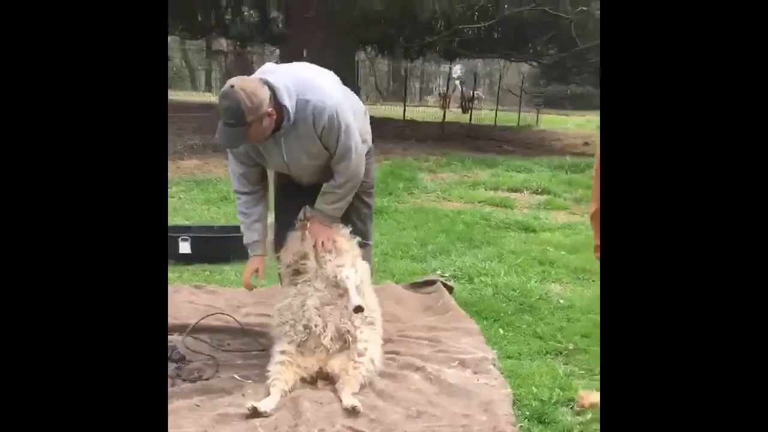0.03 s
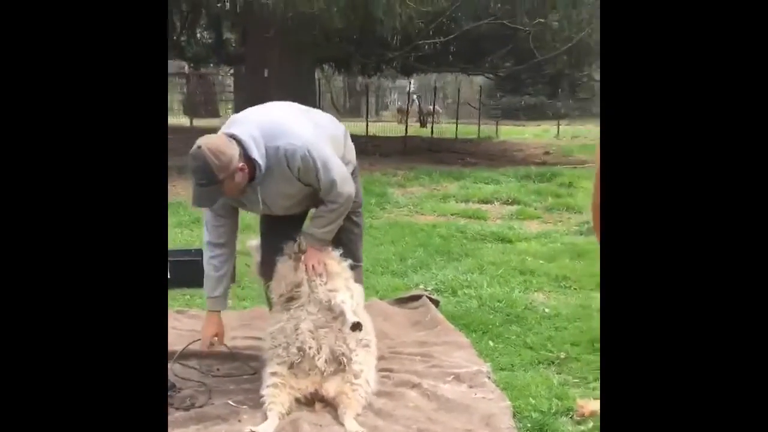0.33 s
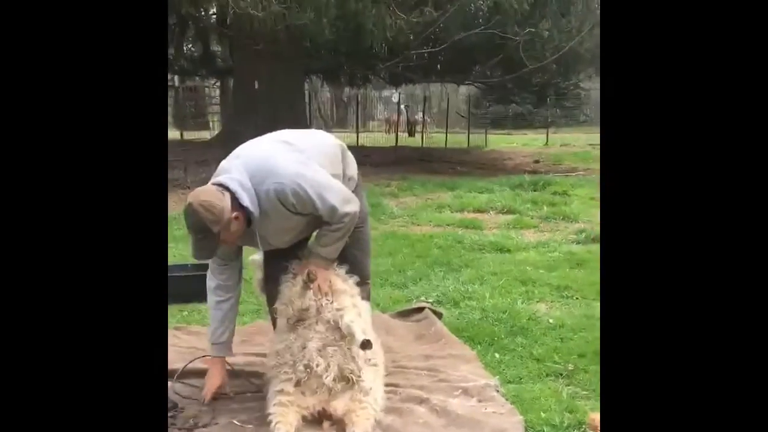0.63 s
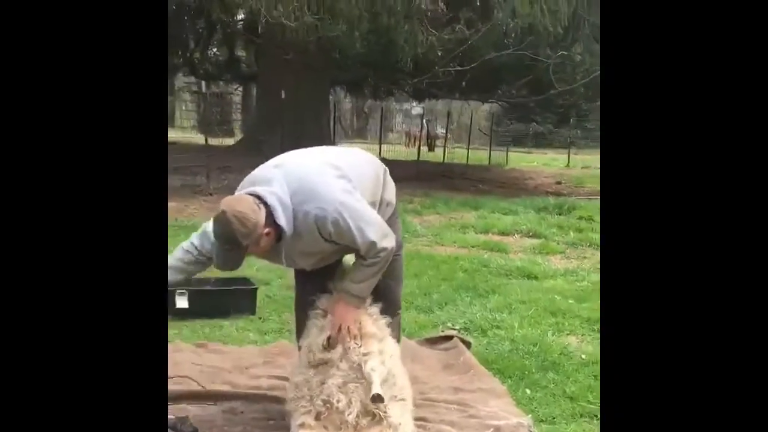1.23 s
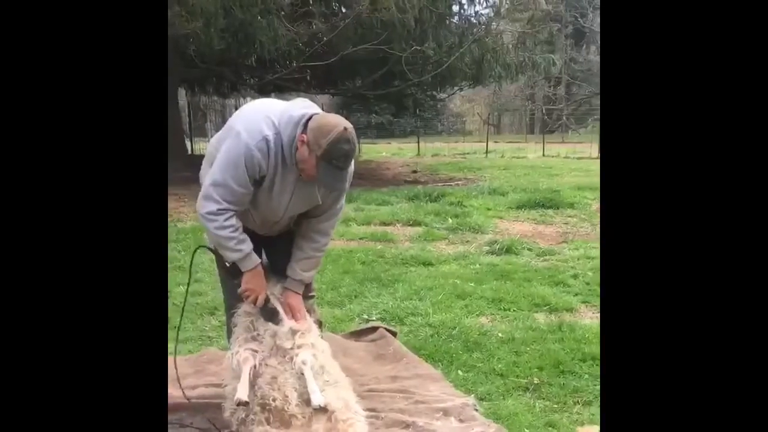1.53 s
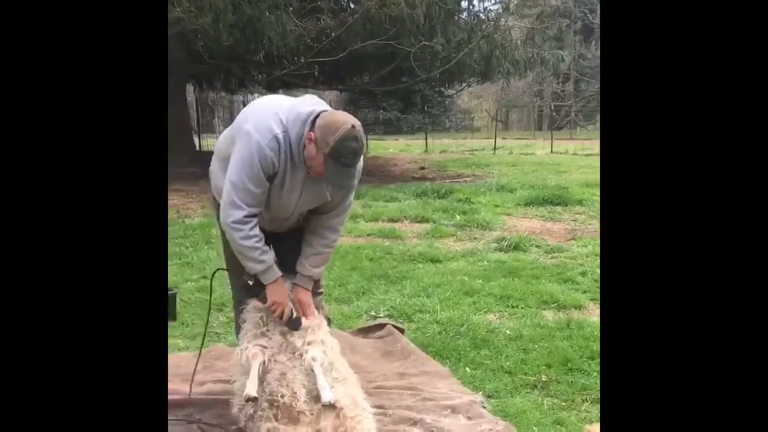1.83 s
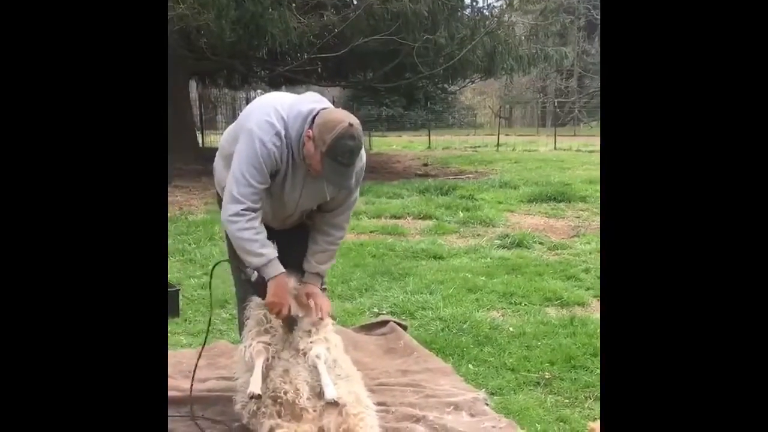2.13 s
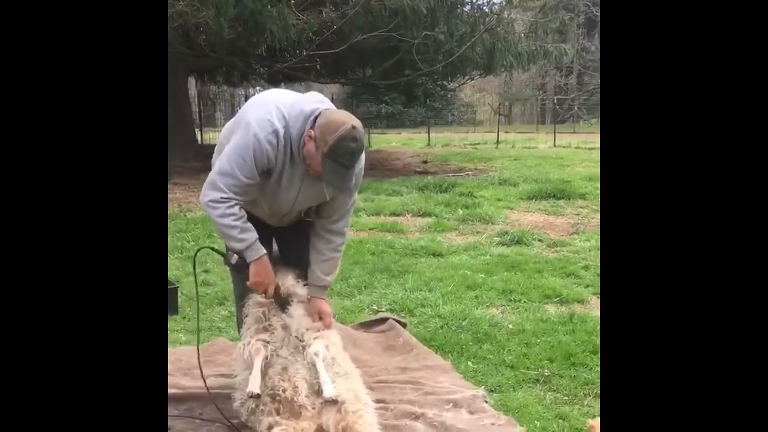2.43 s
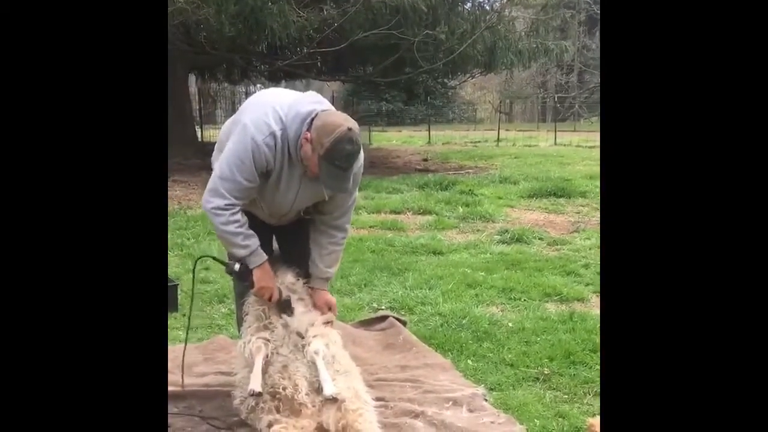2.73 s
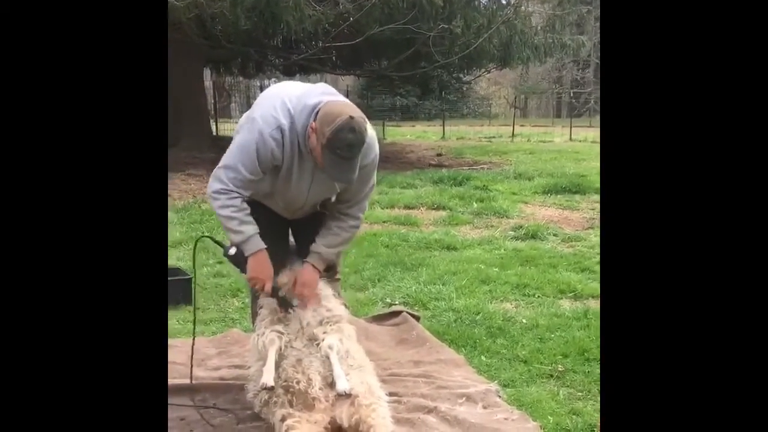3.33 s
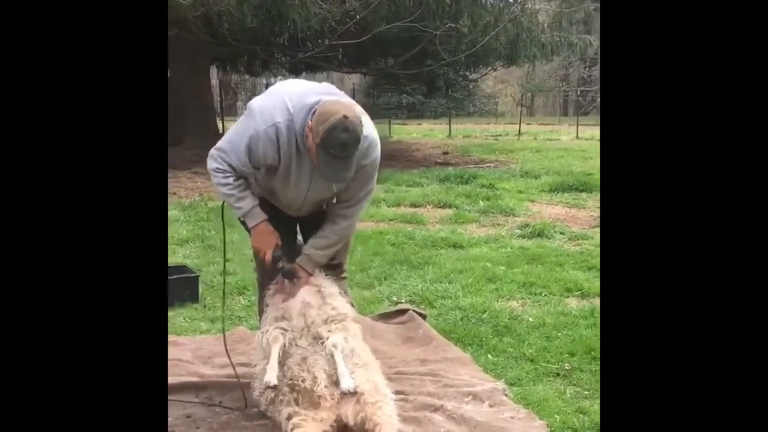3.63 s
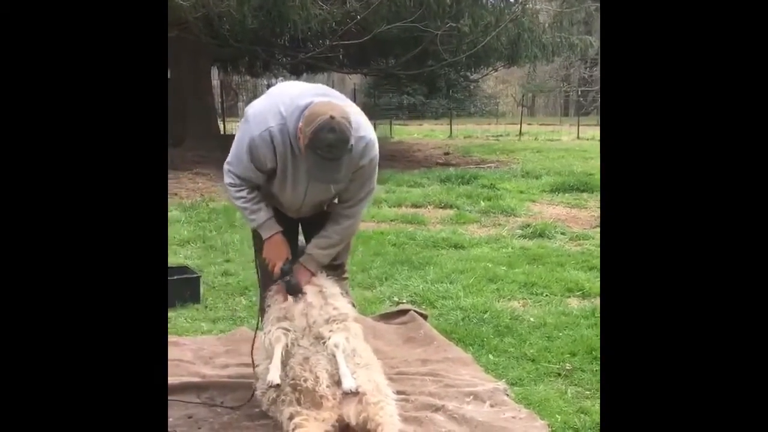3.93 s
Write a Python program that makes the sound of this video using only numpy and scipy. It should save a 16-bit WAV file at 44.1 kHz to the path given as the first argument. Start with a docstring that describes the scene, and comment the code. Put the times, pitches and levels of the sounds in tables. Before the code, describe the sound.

Electric shears start after some handling clicks and rustles, then buzz steadily through fleece.

```python
"""Outdoors, a shearer drags his handpiece and its cable off a cloth tarp, with rustles, ticks and a few
bumps on the microphone. From 1.27 s the electric shears run through a sheep's fleece: the cutter clacks
at both ends of its stroke and scrapes over the comb, making the metal ring, while the geared motor
whines and slows in thick wool. Light wind buffets the microphone, and a far bird chirps once."""
import sys
import numpy as np
from scipy import signal
from scipy.fft import rfft, irfft
from scipy.io import wavfile
from scipy.ndimage import uniform_filter1d

SR = 44100
rng = np.random.default_rng(int(sys.argv[2]) if len(sys.argv) > 2 else 0)


def store_wav(level_fs):
    """Save 16-bit WAV to argv[1]."""
    pcm = np.round(np.clip(np.atleast_2d(level_fs), -1, 1) * 32767)
    wavfile.write(sys.argv[1], SR, pcm.T.astype(np.int16))


N = 176400
T = np.arange(N) / SR
HZ = np.maximum(np.arange(N // 2 + 1) * SR / N, 1)
SHEARS_ON_S = 1.27

# How fast the cutter swings to and fro (time [s], speed [strokes per s])
CUTTER_SPEED = [(1.3, 39.95), (1.7, 40.46), (1.92, 37.71), (2.15, 38.08), (2.45, 39.75), (2.7, 40.33),
                (2.95, 40.4), (3.17, 39.88), (3.4, 40.44), (3.6, 40.5), (4.0, 41.42)]
def shears():
    """The motor drives the cutter, so the whine and the clatter slow down together."""
    speed = curve(CUTTER_SPEED)
    strokes = 0.432 + np.cumsum(speed) / SR - speed[0] * SHEARS_ON_S  # comes in mid-stroke
    fade_in = np.clip((T - SHEARS_ON_S) / .02, 0, 1)
    force = cutter(strokes, speed)
    return fade_in * (blades(force) + bites(force) + motor(strokes))


# Two turnarounds a stroke, each with two bounces (place in stroke [0-1], strength [dB], decay [ms])
KNOCKS = [(.005, 9, 2.45), (.15, -1, 4.5), (0.342, 7.5, 1.1), (.505, 12, 2), (.64, 4, 1.8),
          (.79, 4.5, 0.94)]
def cutter(strokes, speed):
    """The cutter scrapes over the comb and knocks at each end, harder when the wool slows it."""
    free_speed, db_per_lost_stroke = 41.2, 1.5
    jitter_s, scatter_db, rise_s = .00012, 1.3, .00018
    numbers = np.arange(int(strokes[-1]) + 1)
    load = gain(db_per_lost_stroke * np.maximum(free_speed - speed, 0))
    scrape = gain(1) * np.exp(0.17 * wander(600))
    power, clicks = scrape ** 2, np.zeros(N)
    for place, db, decay_ms in KNOCKS:
        timing, strength = np.clip(rng.standard_normal((200, 2)), -1.6, 1.6)[:len(numbers)].T
        times = np.interp(numbers + place, strokes, T, right=2 * T[-1]) + jitter_s * timing
        at = (times * SR).astype(int)
        hits, heard = np.zeros(N), at < N
        hits[at[heard]] = gain(db + scatter_db * strength)[heard]
        power += die_away(hits * load, decay_ms / 1000, rise_s) ** 2
        clicks += hits * load * np.sign(noise())
    force = np.sqrt(power) * noise() + gain(3) * np.roll(clicks, int(rise_s * SR))
    return force / np.std(force[T > SHEARS_ON_S])


# Where handpiece, comb and cutter ring (pitch [Hz], width [Hz], relative level [dB])
METAL_RINGS = [(671.5,177,-5.5), (920,940,-19), (1279,560,-10.5), (1674,630,-12), (2166,520,0.5),
               (2635,650,1), (3336,990,-2), (4040,1380,-4.5), (5400,340,-10), (5820,1400,-6),
               (6900,1070,-9.5), (8730,3200,-9), (11870,1340,-10.5), (13700,2900,-17)]
# Loudness in five pitch bands, before the trims
# (time [s], low [dB], low middle [dB], middle [dB], high middle [dB], high [dB])
BAND_LEVELS = [(1.3, -41.5, -40, -35, -32.5, -32.5), (1.5, -40, -44, -31, -32, -33.4),
               (1.7, -41, -39, -28.5, -31.5, -33), (1.88, -39.5, -37.5, -31, -30.5, -32.5),
               (2.05, -41.5, -45, -32.5, -30, -34.5), (2.25, -42.5, -41.5, -34.5, -33, -34.5),
               (2.45, -39.5, -42.9, -33.5, -31.5, -34.2), (2.7, -40.5, -44, -32.5, -32, -34.5),
               (2.9, -39, -41, -32.5, -33, -33.5), (3.05, -39.5, -42, -30.5, -30, -35),
               (3.18, -39, -44, -34.5, -33, -34.5), (3.3, -41.5, -43, -32.5, -32, -32.5),
               (3.43, -43.5, -40, -34.8, -31.5, -34.5), (3.56, -42.5, -40.5, -36.5, -31.5, -31.5),
               (3.75, -45.5, -42, -34.5, -31.1, -32), (4.0, -44.5, -42.5, -37, -32.0, -33.5)]
# Borders between the bands (frequency [Hz])
BAND_EDGES = (950, 1700, 3100, 7500)
# A small adjustment to each band, low to high (trim [dB])
BAND_TRIMS = (-0.34, -0.32, -1.1, -0.51, 0)
def blades(force):
    """The knocks ring the metal; its tone shifts as the grip changes and the handpiece turns."""
    metal = sum(ring(force, hz, width) * np.sqrt(width) * gain(db + 1.8 * wander(3))
                for hz, width, db in METAL_RINGS)
    spectrum = rfft(metal)
    below_edge = [0] + [1 / (1 + (HZ / hz) ** 12) for hz in BAND_EDGES] + [1]
    out = 0
    for k, trim_db in enumerate(BAND_TRIMS):
        band = irfft(spectrum * (below_edge[k + 1] - below_edge[k]), N)
        out += steady(band) * gain(curve(BAND_LEVELS, column=k + 1) + trim_db)
    return out


# Bites into thick wool (time [s], half length [s], pitch [Hz], width [Hz], strength [dB])
BITES = [(1.37, 0.092, 2720, 160, -32), (1.84, 0.17, 4050, 200, -37), (1.906, 0.16, 2490, 298, -34.5),
         (2.0, 0.24, 5760, 1100, -40.5), (2.095, .2, 3180, 200, -39), (2.37, 0.085, 2690, 160, -33.5),
         (3.025, 0.22, 2510, 160, -32.5), (3.084, 0.12, 1255, 200, -39), (3.507, 0.14, 1278, 201, -39.5),
         (3.564, 0.042, 3410, 130, -32)]
def bites(force):
    """The blades ring briefly around one pitch as they bite."""
    return sum(gain(db) * swell(at, length) * ring(force, hz, width)
               for at, length, hz, width, db in BITES)


# How loud the gear whines (time [s], relative level [dB])
GEAR_WHINE = [(1.3, -35), (1.7, -37), (1.9, -44), (2.05, -45), (2.2, -34.5), (2.8, -35), (3.0, -44),
              (3.15, -45), (3.25, -30), (3.45, -44.5), (4, -38.5)]
# Tones of motor and gear (pitch [times the motor speed], level [dB])
MOTOR_TONES = [(1, -62), (2, -66.5), (3, -62.5), (6, -54.5), (18, -51)]
# Hum of the fork that swings the cutter (pitch [times the stroke rate], level [dB])
FORK_TONES = [(8, -68.5), (10, -66.5), (12, -78), (13, -57), (15, -52.5), (17, -59.5), (19, -58),
              (32, -53.5)]
# Moments when the motor strains (time [s], half length [s])
STRAINS = [(1.85, 0.28), (3.05, 0.14)]
def motor(strokes):
    """The spinning motor, its meshing gear teeth and the swinging fork give wavering tones."""
    def tone(cycles, db, wobble):
        level = np.sqrt(2) * gain(db + 2.5 * wander(19.5))
        return level * np.sin(2 * np.pi * cycles + wobble * wander(47))
    turns_per_stroke, gear_teeth = 3.487, 15
    whine_wobble, hum_wobble = .6, .2  # radians
    turns = turns_per_stroke * strokes
    whine = tone(gear_teeth * turns, curve(GEAR_WHINE) - 1.5, whine_wobble)
    whine *= 1 + .35 * wander(100)  # a fast flutter makes it rasp
    hum = sum(tone(k * turns, db, hum_wobble if k < gear_teeth else whine_wobble)
              for k, db in MOTOR_TONES)
    strain = tone(2 * turns, -59.5, hum_wobble) * sum(swell(at, length) for at, length in STRAINS)
    fork = sum(tone(k * strokes, db, hum_wobble) for k, db in FORK_TONES)
    return whine + hum + strain + fork


# How loud the dragging is (time [s], level [dB])
DRAG_LEVELS = [(0, -53), (.04, -46.5), (.07, -61), (.39, -81), (.46, -50), (.56, -63), (.61, -48),
               (.67, -56), (.72, -35), (.79, -35), (.81, -50), (.83, -37.5), (.9, -38.5), (1.04, -38.5),
               (1.1, -54), (1.15, -58), (1.19, -38), (1.245, -37.5), (1.26, -58.5)]
# Tone of the rustle (frequency [Hz], relative level [dB])
DRAG_COLOUR = [(150, -19), (300, -14.5), (700, -9), (1150, -12), (1800, -3), (3800, -2.5), (5000, -6.5),
               (6000, 0.5), (7200, -9), (9300, -1), (10500, -6.5), (12000, -7), (15500, -11)]
def dragging():
    """The cable rubs over the tarp with a gritty rustle."""
    grit = noise() * np.exp(0.38 * wander(470) + 0.24 * wander(70))
    return colour(unit(grit) * gain(curve(DRAG_LEVELS)), DRAG_COLOUR)


# Taps of cable and handpiece (time [s], strength [dB], dullness [0-1])
TAPS = [(0.022, -25.5, 0.56), (0.04, -28.5, 0.8), (.0932, -37.5, .1), (0.1112, -21.5, 0.88),
        (.1305, -35, 0.3), (0.195, -43, 1), (0.2225, -43, 0.8), (0.368, -48, 0.1), (0.417, -41, 0.7),
        (0.4377, -37, 0.3), (0.49, -35.5, 0.7), (.536, -32.5, 0.6), (.576, -30, 0.04), (0.586, -22, 0),
        (0.6, -23, 0.07), (0.612, -27, 0.05), (.640, -31.5, 0.2), (0.6592, -33.5, 0), (0.698, -23.5, 0.04),
        (.711, -25, 0.2), (.778, -25, 0.4), (0.8037, -20.5, 0), (0.8207, -20, 0), (0.838, -21.5, 0),
        (1.036, -23.5, 0.15), (1.084, -20, 0.02), (1.1218, -24.5, 0.05), (1.1505, -25.5, 0),
        (1.165, -26, 0), (1.1746, -17.5, 0.04), (1.2145, -20.5, 0), (1.228, -23, 0), (1.275, -33, .7),
        (1.285, -28, .9)]
# Tone of a sharp tick (frequency [Hz], relative level [dB])
TICK_COLOUR = [(200, -12.5), (900, -6.5), (3500, -1.5), (5000, -1.5), (9000, -2.5), (10500, -3),
               (12000, -5), (16000, -8.5)]
# Where the handpiece rings when it clacks (pitch [Hz], width [Hz], relative level [dB])
CLACK_RINGS = [(1110, 260, -18), (2350, 410, -1.5), (3400, 860, -6), (6450, 1600, -24)]
def taps():
    """Cable and handpiece knock as they move: each tap is part sharp tick, part dull clack."""
    def burst(hits):
        snap = die_away(hits, decay_s=.0019, rise_s=.00011)
        tail = gain(-21) * die_away(hits, decay_s=.01, rise_s=.001)
        return noise() * (snap + tail)
    sharp, dull = np.zeros(N), np.zeros(N)
    for at, db, dullness in TAPS:
        sharp[int(at * SR)] = gain(db - 5) * np.sqrt(1 - dullness)
        dull[int(at * SR)] = gain(db - 5) * np.sqrt(dullness)
    return colour(burst(sharp), TICK_COLOUR) + resonate(burst(dull), CLACK_RINGS)


# Bumps on the microphone (time [s], pitch [Hz], half length [s], peak level [dB])
BUMPS = [(.0165, 220, .0013, -12), (.027, 125, .009, -25), (.2205, 75, .006, -19), (.213, 200, .0025, -28),
         (.269, 150, .003, -31), (.286, 170, .0024, -23), (.295, 80, .008, -22), (.303, 200, .0028, -29),
         (.3145, 170, .003, -32)]
def bumps():
    """A hand knocks the microphone, making short, low thumps."""
    return sum(gain(db) * np.cos(2 * np.pi * hz * (T - at)) / np.cosh(np.minimum(abs(T - at) / span, 20))
               for at, hz, span, db in BUMPS)


# Puffs of wind (time [s], half length [s], level [dB])
GUSTS = [(.1, 0.3, -39.5), (1.404, 0.037, -44), (1.609, 0.082, -32), (1.997, 0.04, -38),
         (2.106, 0.028, -39), (2.296, 0.054, -39), (2.414, 0.046, -36), (2.59, 0.027, -39),
         (2.869, 0.064, -41.5), (3.03, 0.035, -30), (3.211, 0.049, -30), (3.328, 0.017, -33),
         (3.435, .03, -43), (3.61, .03, -44), (3.866, .05, -39)]
# Tone of the wind (frequency [Hz], relative level [dB])
WIND_COLOUR = [(20, -31), (45, 1.5), (68, -0.5), (110, -7), (200, -21.5), (400, -51), (900, -72)]
def wind():
    """Light gusts buffet the microphone with soft, deep noise."""
    gusts = sum(gain(db) * swell(at, length) for at, length, db in GUSTS)
    return gusts * steady(colour(noise(), WIND_COLOUR))


# Tone of the low rumble (frequency [Hz], relative level [dB])
RUMBLE_COLOUR = [(20, -51), (50, 2), (80, 0.5), (120, -12.5), (200, -14), (300, -20.5), (800, -52.5)]
# Tone of the faint hiss (frequency [Hz], relative level [dB])
HISS_COLOUR = [(240, -33), (400, -5), (576, -1.5), (3150, -12), (3770, -16), (5030, -22), (5950, -21),
               (15000, -40)]
def open_air():
    """A slowly swelling rumble and an even hiss lie behind everything."""
    rumble = unit(colour(noise(), RUMBLE_COLOUR)) * gain(-48 + 1.5 * wander(0.67))
    hiss = unit(colour(noise(), HISS_COLOUR)) * gain(-59.5)
    return rumble + hiss


# One chirp (time [s], half length [s], pitch [Hz], slide [Hz per s], level [dB])
CHIRP = (.35, .04, 6080, -8000, -68)
def bird():
    """A far bird gives one faint, falling whistle."""
    at, length, hz, slide, db = CHIRP
    pitch = hz + slide * (T - at) + 60 * wander(200)
    return gain(db) * swell(at, length) * np.sin(2 * np.pi * np.cumsum(pitch) / SR)


def gain(db):
    """Turn decibels into a number to multiply by."""
    return 10 ** (np.asarray(db) / 20)


def unit(x):
    """Scale a signal so its typical size is 1."""
    return x / np.std(x)


def steady(x):
    """Even out slow changes in loudness, keeping the quick ones."""
    return x / np.sqrt(uniform_filter1d(x ** 2, size=SR // 7) + 1e-12)


def noise():
    """White noise: a plain hiss."""
    return rng.standard_normal(N)


def wander(rate):
    """A smooth random wiggle that changes about `rate` times a second."""
    return unit(irfft(rfft(noise()) / (1 + (HZ / rate) ** 4), N))


def curve(table, column=1):
    """Join a table's points in time with straight lines."""
    rows = np.array(table)
    return np.interp(T, rows[:, 0], rows[:, column])


def swell(at, half_length):
    """A bell-shaped rise and fall."""
    return np.exp(-((T - at) / half_length) ** 2)


def die_away(hits, decay_s, rise_s):
    """A level that jumps up and fades after each hit."""
    t = T[:N // 20]
    return signal.fftconvolve(hits, np.exp(-t / decay_s) * (1 - np.exp(-t / rise_s)))[:N]


def shape(x, response):
    """Turn each frequency up or down; white noise keeps its overall level."""
    cepstrum = irfft(np.log(response / np.sqrt(np.mean(response ** 2)) + 1e-7), N)
    cepstrum[1:N // 2] *= 2  # folded so that ringing comes after a hit, never before
    cepstrum[N // 2 + 1:] = 0
    return irfft(rfft(x) * np.exp(rfft(cepstrum)), N)


def colour(x, points):
    """Set a sound's tone from (frequency [Hz], level [dB]) points."""
    hz, db = np.array(points).T
    return shape(x, gain(np.interp(np.log(HZ), np.log(hz), db)))


def resonate(x, rings):
    """Keep the sound near the pitches where an object rings."""
    power = sum((gain(db) / (1 + ((HZ / hz - hz / HZ) * hz / width) ** 2)) ** 2
                for hz, width, db in rings)
    return shape(x, np.sqrt(power))


def ring(force, hz, width):
    """Noisy ringing around one pitch that follows the size of the force."""
    return resonate(force * np.sign(noise()), [(hz, width, 0)])


def scene():
    """All the sounds meet at one microphone."""
    return (shears() + dragging() + taps() + bumps() + wind() + open_air() + bird())[None]


def record(dry):
    """The recorder cuts the highest treble, above 15900 Hz."""
    return signal.sosfilt(signal.ellip(10, .2, 80, 15900, fs=SR, output="sos"), dry)


dry = scene()
out = record(dry)
store_wav(out)
```